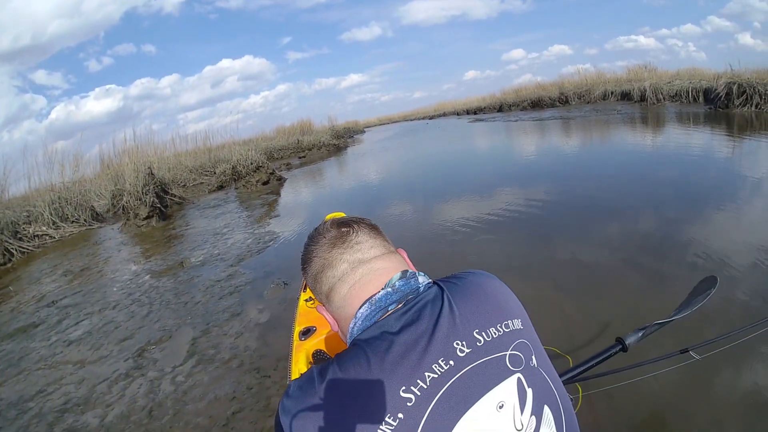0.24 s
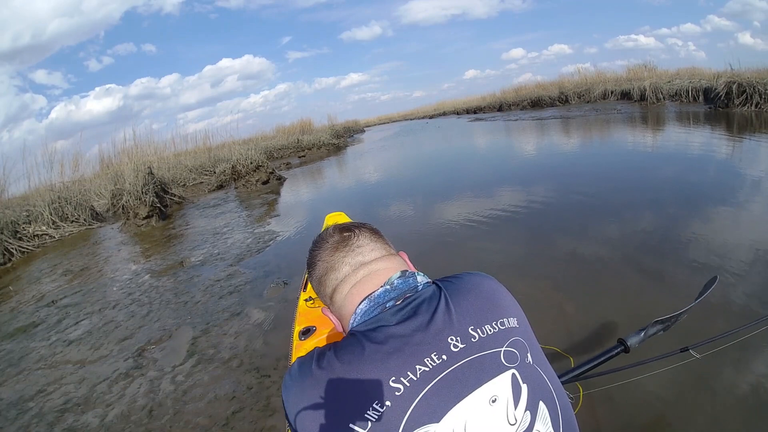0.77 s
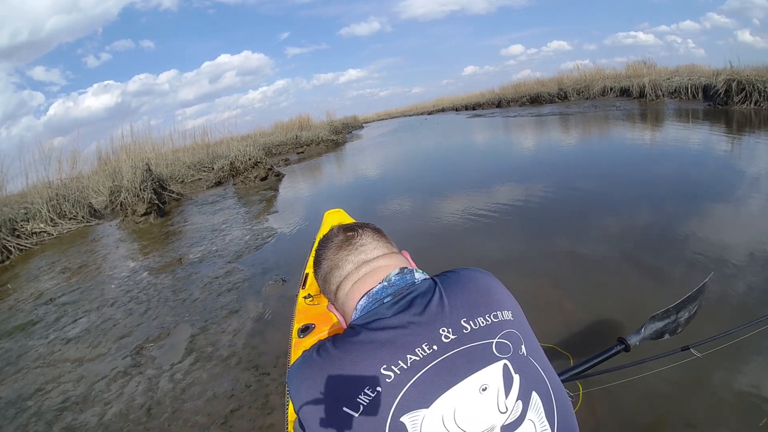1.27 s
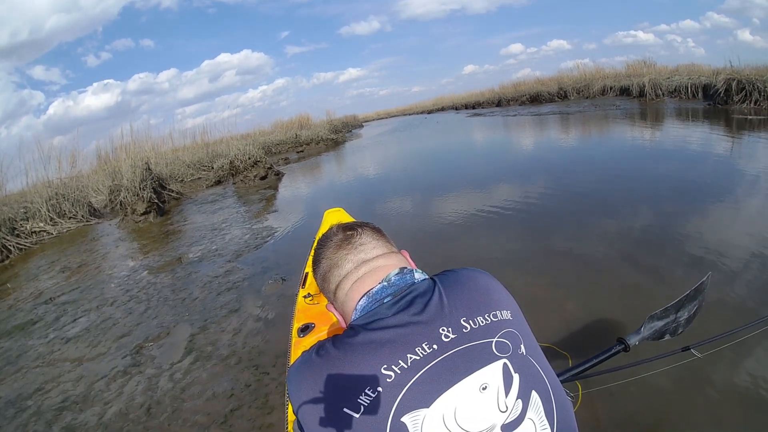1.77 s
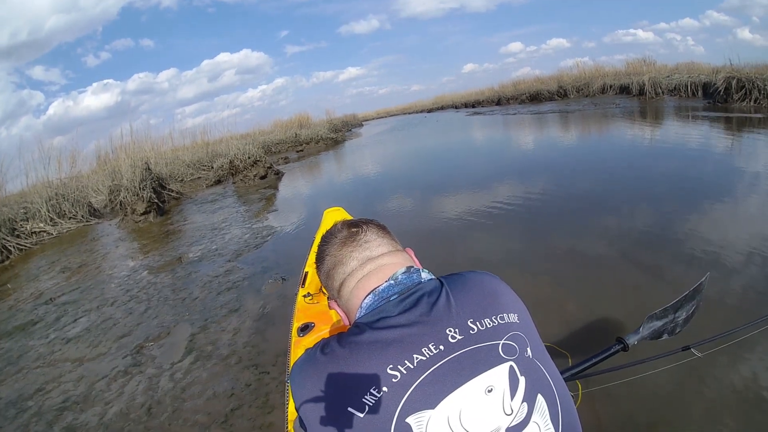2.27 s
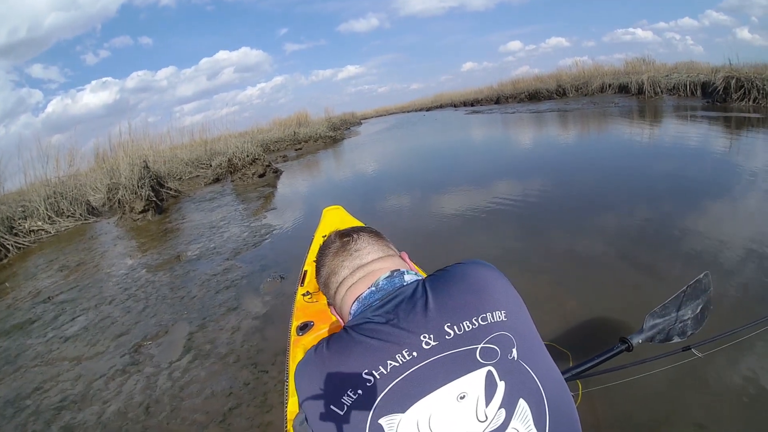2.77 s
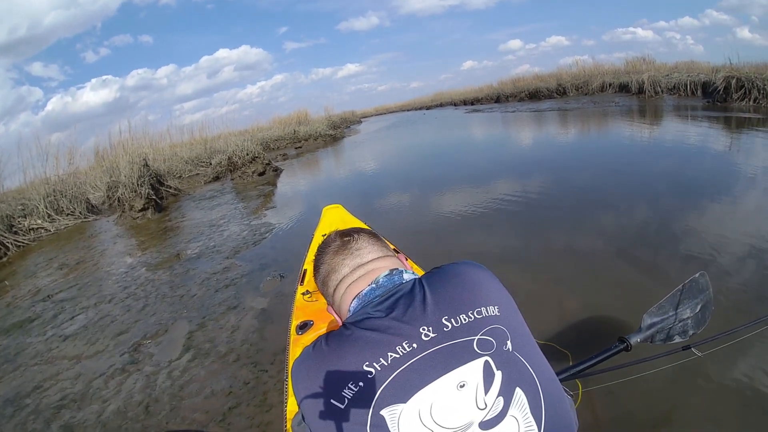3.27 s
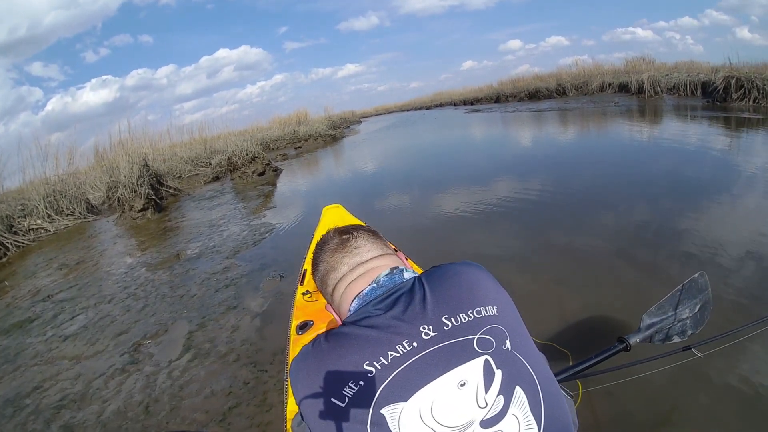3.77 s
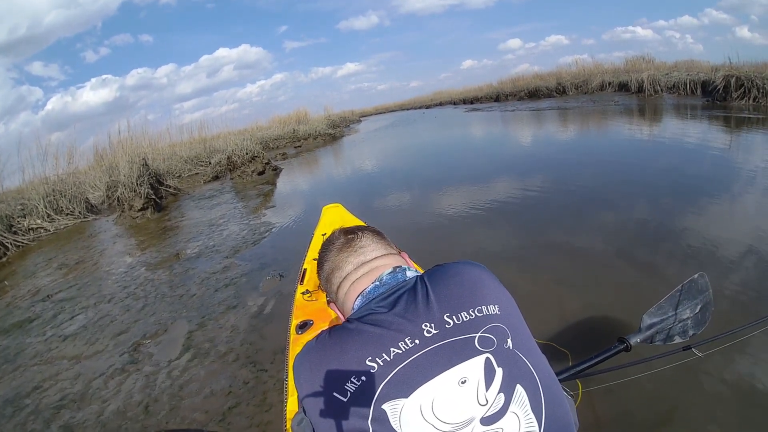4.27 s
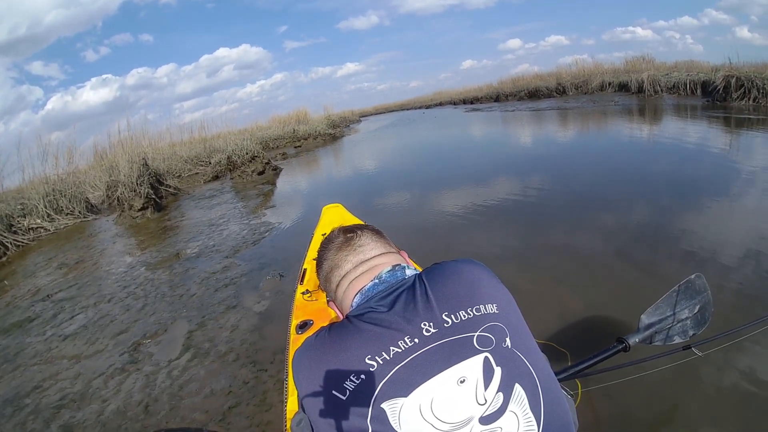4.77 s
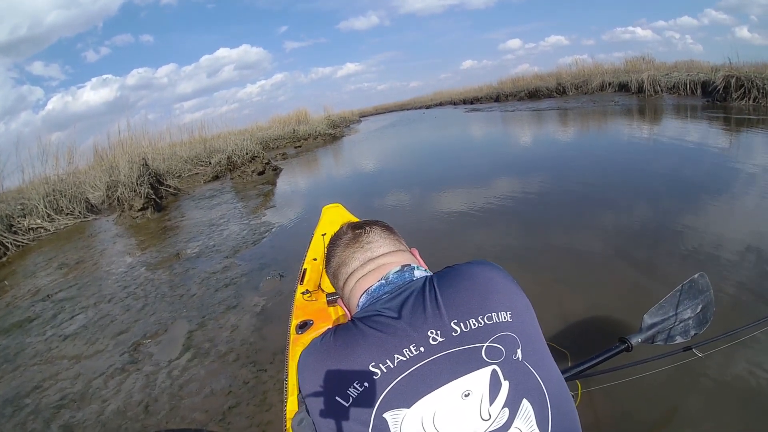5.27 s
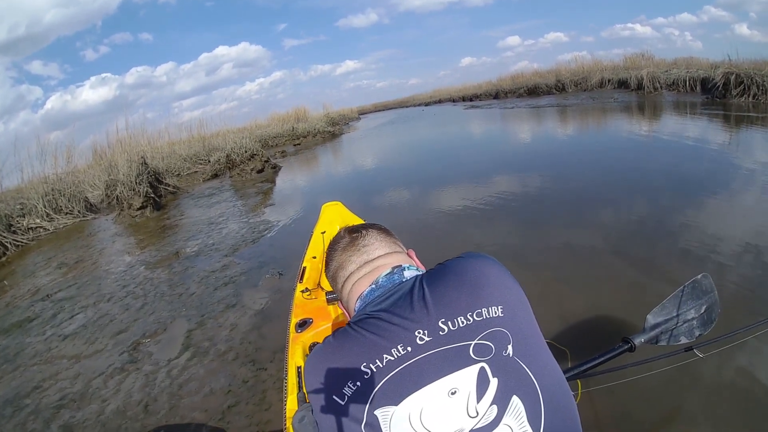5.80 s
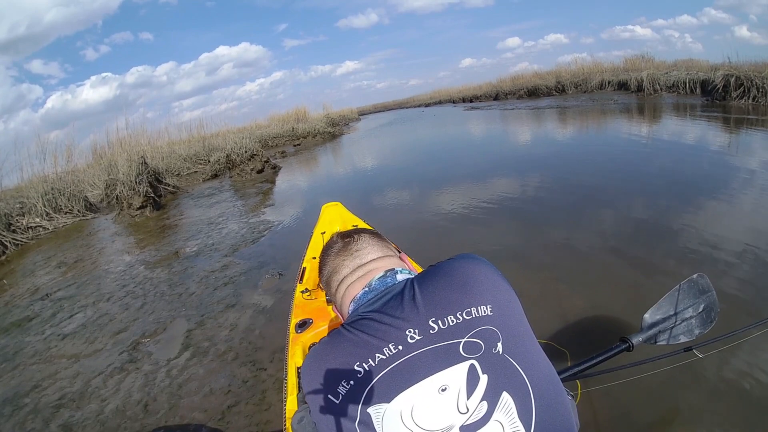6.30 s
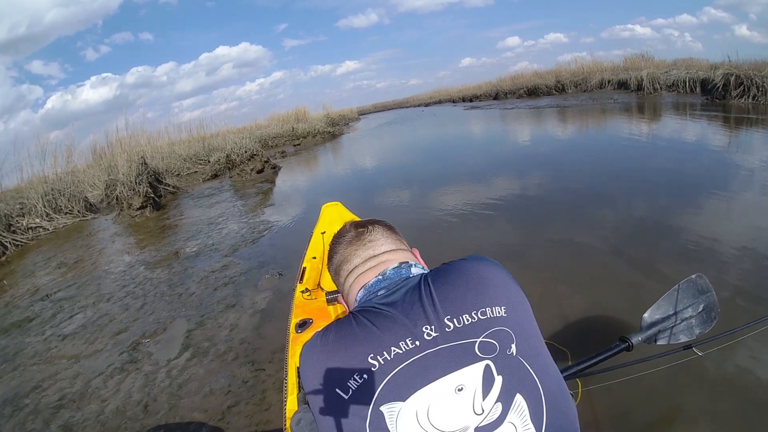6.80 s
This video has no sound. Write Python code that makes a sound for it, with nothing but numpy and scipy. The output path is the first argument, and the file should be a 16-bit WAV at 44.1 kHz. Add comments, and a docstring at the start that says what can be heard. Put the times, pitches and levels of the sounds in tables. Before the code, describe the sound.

An open, dry outdoor scene on calm water. A busy burst of clicking and sliding gear with dull thuds opens it, thinning to occasional short woody-plastic knocks around one, two and a half, and four seconds. A deep hull bump with a clatter precedes one hard knock near six seconds; soft cloth rustles and a small click end it. Wind bumps softly on the microphone over low rumble, thin hiss and barely audible water.

```python
"""Gear sorted in a drifting kayak

Hard objects knock on a hollow plastic deck, heavy ones thump the hull: impulses excite decaying modes.
Small tackle clicks, gear slides and sleeves rustle: shaped noise from many micro-contacts; squeaks glide.
Drops fall into the calm creek and a trickle gurgles: rising bubble tones and resonant noise bands.
Wind buffets the microphone and the open marsh rumbles and hisses: coloured noise of wavering level."""
import sys
import numpy as np
from scipy import signal
from scipy.fft import rfft, irfft
from scipy.io import wavfile
from scipy.ndimage import uniform_filter1d

SR = 44100
rng = np.random.default_rng(int(sys.argv[2]) if len(sys.argv) > 2 else 0)


def transcribe(u):
    """Save the signal u as a 16-bit wav file named by the first command-line argument.

    u: samples, shape (n,) or (channels, n), limited to [-1, 1]; the rate is SR.
    q: integer samples, one column per channel.
    """
    v = np.clip(np.atleast_2d(u).T, -1, 1)
    q = np.round(v * 32767).astype(np.int16)
    wavfile.write(sys.argv[1], SR, q)


N = 310905  # length in samples

# panel modes of the hollow deck: [mode_hz, level_db, t60_s]
DECK_MODES = [(545.5, 7.5, 0.068), (630, 0, 0.036), (749, 10, 0.043), (782, -0.5, 0.055), (823, -12, 0.066),
              (1094, -8.5, 0.03), (1370, -9, 0.014), (1560, -37, .02), (2520, 2.5, 0.014), (3900, -13, .01)]
# flexing modes of the whole hull, damped by the water: [mode_hz, level_db, t60_s]
HULL_MODES = [(73.8, -6, 0.47), (106, 4, 0.09), (151.2, -2.5, 0.24), (172, 5.5, 0.059), (214.4, -1, 0.15),
              (261, -10.5, 0.3), (393, -6, 0.11), (444, -3, 0.075)]
# hard knocks on the deck; the low cut is higher near a stiff edge, the ring share multiplies the deck's t60:
# [start_s, peak_db, contact_ms, low_cut_hz, ring_share (ratio)]
DECK_KNOCKS = [(0.528, -42, 0.47, 1040, 1.4), (.9470, -22.5, 0.72, 563, 0.84),
               (1.114, -45.5, 0.71, 600, 1.1), (2.178, -46.5, 1.33, 550, 1.2),
               (2.404, -42.5, 1.56, 460, 0.58), (2.411, -48, 0.52, 700, 1.5),
               (2.4693, -30, 0.54, 1150, 1.23), (2.594, -20, 0.65, 553, 0.84), (2.663, -39.5, 1.1, 456, 1),
               (2.846, -52, 0.54, 501, 0.73), (2.913, -54, 0.36, 910, 1.07), (3.502, -52, 0.8, 600, 1.8),
               (3.758, -50, 0.41, 760, 1.2), (3.793, -53, 0.45, 600, 1.02), (4.026, -45, 0.66, 784, 2.6),
               (4.225, -50, 0.48, 550, 1), (4.3112, -21, 0.66, 507, 0.95), (4.675, -43.5, 1.3, 448, 1.3),
               (4.888, -52.5, 0.73, 903, 1.2), (5.107, -39, 1.4, 600, 0.88), (5.123, -41, .85, 1050, .8),
               (5.166, -50, 1.2, 600, 1), (5.311, -36, 1.0, 604, 0.91), (5.321, -41, 0.62, 844, 0.86),
               (5.339, -52, 0.56, 800, 0.93), (5.857, -15, 0.65, 715, 0.93), (5.902, -38, 0.44, 1155, .8),
               (6.856, -43.5, 0.48, 770, 0.8)]
# soft heavy blows on the hull; the shake is relative to the blow: [start_s, peak_db, contact_ms, shake_db]
HULL_THUMPS = [(0.15, -27, 4.64, -31), (0.236, -28, 2.54, -11), (0.241, -33, 3.3, -23),
               (0.257, -28, 3.2, -22), (.29, -43, 3.4, -19), (.374, -38, 4, -10.5), (.47, -38, 3.2, -15),
               (.853, -30, 2.9, -19), (1.112, -46, 1.2, -5), (2.265, -34, 8, -19.5), (2.6, -33.5, 4, -29),
               (3.191, -49.5, 2, 0.5), (4.683, -38, 2.26, -25), (5.105, -18.5, 3.03, -16),
               (5.13, -32, 5.8, -14.5), (5.184, -39.5, 1.02, -11), (5.311, -27, 1.7, -13),
               (5.319, -31.5, 4.7, -19), (6.731, -48.5, 1.8, 2)]
# the clearest clicks of small tackle: [start_s, peak_db, t60_s, part_hz]
TACKLE_CLICKS = [(0.032, -38.5, 0.072, 1660), (0.064, -47, 0.062, 2500), (0.073, -52, 0.024, 2000),
                 (0.101, -47, 0.04, 2220), (0.219, -37.5, 0.058, 2140), (0.236, -36, 0.087, 2290),
                 (0.251, -36, 0.039, 2400), (0.259, -39.5, .025, 2350), (0.295, -44, 0.02, 2300),
                 (0.317, -39, 0.036, 2820), (0.358, -44, 0.022, 2970), (0.373, -47, 0.026, 2200),
                 (0.409, -57, .02, 2680), (.462, -40.5, 0.13, 1640), (0.485, -47, 0.017, 2800),
                 (0.553, -56, 0.03, 6500), (0.721, -55, 0.014, 2400), (0.746, -48.5, 0.014, 1190),
                 (0.777, -48, 0.02, 1700), (0.795, -49.5, 0.023, 2700), (0.901, -52, 0.023, 2630),
                 (1.043, -48, 0.04, 2700), (1.11, -44, 0.049, 2400), (1.352, -53.5, 0.017, 2930),
                 (1.481, -53.5, 0.014, 7000), (1.523, -51.5, 0.078, 4730), (1.909, -53.5, 0.019, 3900),
                 (1.928, -48.5, 0.025, 2760), (2.033, -48.5, 0.067, 3960), (2.122, -48, 0.031, 1990),
                 (2.173, -43.5, 0.06, 2410), (2.208, -57, .02, 2500), (2.226, -60, 0.023, 3600),
                 (2.248, -55, .04, 3600), (2.38, -48.5, 0.045, 2770), (2.41, -55, 0.013, 2670),
                 (2.465, -49, 0.073, 2670), (2.610, -51, 0.039, 4780), (2.892, -56, 0.03, 2267),
                 (3.194, -45, 0.021, 2000), (3.339, -54, 0.039, 5060), (3.463, -48.5, 0.044, 1800),
                 (3.771, -48.5, 0.024, 2460), (4.024, -46.5, 0.059, 2060), (4.268, -44.5, 0.054, 1670),
                 (4.67, -52.5, .02, 2090), (4.711, -48.5, 0.02, 1960), (5.105, -44, 0.1, 2300),
                 (5.121, -46, .04, 2000), (5.153, -49.5, 0.041, 3700), (5.182, -37.5, 0.055, 3280),
                 (5.185, -38.5, 0.019, 3110), (5.279, -37.5, 0.024, 3400), (5.304, -40.5, 0.045, 3790),
                 (5.32, -43, 0.12, 2202), (5.524, -50, 0.024, 1660), (5.764, -50, 0.032, 1187),
                 (5.859, -43.5, 0.005, 3270), (5.898, -45.5, 0.021, 1910), (6.603, -55, 0.056, 9450),
                 (6.731, -34.5, 0.024, 2240), (6.856, -42, 0.011, 1890)]
# slides and short scratches of gear over plastic; rms before the swell and fade:
# [middle_s, length_s, rms_db, tilt_db_per_octave]
GEAR_RUBS = [(0.069, 0.22, -57, -0.5), (0.187, 0.088, -62, 6.5), (0.234, 0.081, -55, 4),
             (.256, 0.011, -44.5, 5), (0.335, 0.25, -56.5, 2.5), (0.318, 0.017, -63, 9),
             (0.351, 0.037, -61, 6), (0.362, 0.017, -53, 6.5), (0.372, .012, -56, 2),
             (0.793, .36, -63.5, -2), (1.095, 0.18, -66, 3.5), (1.547, .09, -65, 5), (1.921, 0.22, -72, 9),
             (2.226, 0.17, -61.5, 2.5), (2.873, 0.27, -63, -7), (3.78, 0.072, -58.5, -4),
             (4.002, 0.089, -56, -7.5), (5.294, 0.05, -48.5, 1), (5.67, 0.37, -66.5, -1.5)]
# soft rustles of sleeves over the deck; rms before the swell and fade: [middle_s, length_s, rms_db]
SLEEVE_RUSTLES = [(0.721, 0.093, -64), (.865, 0.068, -61), (1.137, 0.046, -58.5), (2.024, 0.13, -55.5),
                  (3.392, 0.021, -60), (3.432, 0.05, -54.5), (3.458, 0.029, -51), (5.238, 0.096, -65),
                  (6.242, 0.054, -62), (6.291, 0.04, -58), (6.333, 0.066, -54.5), (6.364, 0.034, -59),
                  (6.603, .04, -68), (6.736, 0.12, -56)]
# short squeaks of gear dragged on the deck: [start_s, pitch_hz, glide_octaves, length_s, peak_db]
GEAR_SQUEAKS = [(0.113, 736, -0.01, 0.024, -38.5), (1.125, 977, -0.29, 0.028, -51.5)]
# drops, each trapping a bubble: [start_s, pitch_hz, rise_octaves, length_s, peak_db]
WATER_DROPS = [(0.011, 1470, 0.069, 0.008, -46.5), (0.967, 2710, 0.044, .007, -58),
               (1.531, 1106, 1, 0.041, -53), (1.533, 284, 0.89, 0.031, -46),
               (3.01, 2130, 0.29, 0.0094, -48), (4.493, 2600, .05, 0.0074, -58),
               (4.735, 1910, 0.23, 0.014, -52)]
# water trickling along the mud bank, in separate bands; rms before the slow laps: [band_hz, rms_db]
TRICKLE_BANDS = [(780, -78), (1050, -80.5), (1400, -80), (1850, -88), (2350, -84), (2800, -86.5),
                 (3600, -84.5)]
# strength of the wind on the microphone, before WIND_TRIM_DB and the small gusts: [time_s, level_db]
WIND_STRENGTH = [(0.0, -48), (0.33, -41.5), (0.51, -51.5), (0.92, -46), (0.99, -36.5), (1.1, -43),
                 (1.62, -50), (1.95, -47), (2.28, -39), (2.37, -43), (2.489, -38.5), (3.0, -40.5),
                 (3.261, -33), (3.3, -44), (3.551, -36), (3.93, -46), (4.73, -50), (5.3, -42), (5.58, -45),
                 (5.67, -35.5), (5.81, -46), (6.91, -51.5), (7.05, -50)]
# relative spectrum of plastic scraping on plastic: [frequency_hz, level_db]
SCRAPE_COLOUR = [(150, 12), (400, 10.5), (800, 8.5), (1300, 1), (2000, -3.5), (3200, -5), (4100, -9),
                 (4700, -14.5), (6000, -21), (13000, -32)]
# relative spectrum of cloth on plastic: [frequency_hz, level_db]
CLOTH_COLOUR = [(250, 1), (500, 2), (800, 3.5), (1150, -3.5), (1700, -12), (2700, -17.5), (4000, -34.5),
                (7000, -43)]
# relative spectrum of the wind: [frequency_hz, level_db]
WIND_COLOUR = [(10, 9.5), (22, 2), (36, -5.5), (55, -3.5), (80, -15.5), (130, -26), (250, -39), (600, -72)]
# relative spectrum of the steady rumble and hiss of the open marsh: [frequency_hz, level_db]
MARSH_COLOUR = [(30, -4), (55, -10), (82, 5.5), (120, -4.5), (170, -8), (250, -18.5), (400, -22.5),
                (600, -28.5), (780, -25), (1100, -47.5), (1800, -49.5), (2900, -48.5), (5000, -45),
                (13000, -45.5)]

TOP_HZ = 13050  # upper limit of the sound
SPOT_DETUNE, SPOT_SPREAD_DB = .006, 1  # standard deviations from spot to spot: ratio of pitch, dB of level
# the smaller the part, the higher it rings and the brighter it snaps
PLAIN_PART_HZ, BRIGHTEN_DB_PER_OCTAVE = 2020, 4.5
PART_RING_DB, PART_Q = 0, 7
# separate grains of a scratch, relative to the dense slips of a slide
GRAINS_PER_S, GRAIN_DB = 260, 0
# scratches where a slide snags; level relative to the slide, at mid-stroke
SNAGS_PER_S, SNAG_DB, SNAG_T60_S, SNAG_HZ, SNAG_OCTAVES = 38, 10, 0.041, 1670, 0.42
# faint ticks of the busy hands; an exponent above 1 thins them out with time
TICK_DB, TICK_T60_S, TICK_LOW_HZ, TICK_OCTAVES = -56, 0.013, 1900, 1.9
FIDGET_SPREAD_DB, FIDGET_THINNING = 8, 1.5
SPATTER_DB, SPATTER_Q = -6, 2  # noise around a gliding tone, relative to it
GURGLES_PER_S, GURGLE_DEPTH_DB, LAPS_PER_S, LAP_DEPTH_DB = 60, 3.5, 4, 1.2
# fizz of tiny bubbles: weakest peak and added range before the laps, lowest pitch and range above it
POP_DB, POP_SPREAD_DB, POP_LOW_HZ, POP_OCTAVES = -70, 9, 1470, 0.97
WIND_TRIM_DB, GUSTS_PER_S, GUST_DEPTH_DB = 1, 27, 2
AIR_DB, HISS_WAVERS_PER_S, HISS_DEPTH_DB = -55, 9, .8


def undb(db):
    """Logarithmic level: decibels become an amplitude gain."""
    return 10 ** (np.asarray(db) / 20)


def unit(x):
    """Mean power: scale a signal to rms 1."""
    return x / np.sqrt(np.mean(x ** 2))


def peak(x, db):
    """Peak amplitude: scale a signal to a peak level in dB."""
    return x * undb(db) / np.abs(x).max()


def seconds(length):
    """Sampling: the time axis of a short sound."""
    return np.arange(int(length * SR)) / SR


def add(track, s, sound):
    """Superposition: mix a sound into the track at time s, trimming what falls outside."""
    start = int(s * SR)
    sound = sound[max(-start, 0):N - start]
    first = max(start, 0)
    track[first:first + len(sound)] += sound


def colour(x, points, tilt_db=0):
    """Spectral shaping: filter by a (Hz, dB) outline with an optional tilt in dB per octave."""
    hz, db = np.transpose(points)
    octave = np.log2(np.maximum(np.fft.rfftfreq(len(x), 1 / SR), 1))
    tilted_db = db + tilt_db * np.log2(hz / hz[0])
    gain = undb(np.interp(octave, np.log2(hz), tilted_db))
    low_roll_off = np.minimum(2 ** octave / hz[0], 1) ** 2  # 12 dB per octave below the first point
    return irfft(rfft(x) * gain * low_roll_off, len(x))


def band(x, hz, q):
    """Resonance: pass one peak around hz, of quality factor q."""
    return signal.lfilter(*signal.iirpeak(min(hz, TOP_HZ), q, fs=SR), x)


def ring(force, modes, low_hz):
    """Modal superposition: a force drives decaying modes; a panel radiates little below low_hz."""
    t = seconds(.3)
    response = np.zeros(len(t))
    for hz, db, t60 in modes:
        decay = np.exp(-np.log(1000) * t / t60)
        response += undb(db) * decay * np.cos(2 * np.pi * hz * t)
    radiation = signal.butter(3, low_hz, "high", fs=SR, output="sos")
    return signal.sosfilt(radiation, signal.fftconvolve(force, response))


def push(contact_ms):
    """Impact: a half-sine force, whose longer contact gives a duller sound."""
    length = contact_ms / 1000
    return np.sin(np.pi * seconds(length) / length)


def slips(size, spread_db):
    """Stick-slip friction: dense slips of uneven strength, smeared by a few ms of ringing in the plastic."""
    t = seconds(.0035)
    strength = undb(spread_db * np.minimum(rng.exponential(size=size), 6))
    power = signal.fftconvolve(strength ** 2, np.exp(-5 * t / t[-1]), "same")
    return rng.standard_normal(size) * np.sqrt(np.abs(power))


def chatter(t60, rise_s):
    """Repeated contact: a quick run of micro-impacts builds up and dies away."""
    t = seconds(.2)
    envelope = (1 - np.exp(-t / rise_s)) * np.exp(-np.log(1000) * t / t60)
    return slips(len(t), spread_db=5.0) * envelope


def catching(size, rate, depth_db):
    """Random modulation: a gain that wavers, as when a sliding contact grips and lets go."""
    steps = rng.standard_normal(N)
    return undb(depth_db * np.interp(np.arange(size) * rate / SR, np.arange(N), steps))


def knocks():
    """Modal excitation: one push rings the deck, each spot weighting its modes; loose gear buzzes faintly."""
    out = np.zeros(N)
    hz, mode_db, t60 = np.transpose(DECK_MODES)
    for s, db, contact_ms, low_hz, ring_share in DECK_KNOCKS:
        detune, weight = rng.standard_normal((2, len(DECK_MODES)))
        spot_hz = hz * (1 + SPOT_DETUNE * detune)
        spot_db = mode_db + SPOT_SPREAD_DB * weight
        spot = zip(spot_hz, spot_db, t60 * ring_share)
        add(out, s, peak(ring(push(contact_ms), spot, low_hz), db))
        buzz = colour(chatter(t60=0.085, rise_s=0.0092), SCRAPE_COLOUR, tilt_db=-4.0)
        add(out, s, peak(buzz, db - 25))
    return out


def thumps():
    """Flexural vibration: a slow push bends the hull, and the load chatters on the deck as it settles."""
    out = np.zeros(N)
    for s, db, contact_ms, shake_db in HULL_THUMPS:
        add(out, s, peak(ring(push(contact_ms), HULL_MODES, low_hz=47.0), db))
        soften = signal.butter(2, 650, fs=SR, output="sos")
        settle = signal.sosfilt(soften, chatter(t60=0.16, rise_s=0.0022))
        deck_shake = unit(ring(settle, DECK_MODES, low_hz=228))
        hull_shake = undb(9.0) * unit(ring(settle, HULL_MODES, low_hz=325))
        add(out, s, peak(deck_shake + hull_shake, db + shake_db))
    return out


def click(db, t60, hz):
    """Small-body resonance: a part snaps and chatters, ringing briefly at its own pitch."""
    tilt_db = BRIGHTEN_DB_PER_OCTAVE * np.log2(hz / PLAIN_PART_HZ)
    snap = colour(chatter(t60, rise_s=0.00024), SCRAPE_COLOUR, tilt_db)
    return peak(snap + undb(PART_RING_DB) * band(snap, hz, PART_Q), db)


def clicks():
    """Collision of small bodies: tackle parts snap and chatter against each other."""
    out = np.zeros(N)
    for s, db, t60, hz in TACKLE_CLICKS:
        add(out, s, click(db, t60, hz))
    return out


def grains(size):
    """Sparse friction: separate scratches of uneven strength, each a millisecond or two long."""
    t = seconds(.005)
    happens = rng.exponential(size=size), rng.random(size) < GRAINS_PER_S / SR
    strength = undb(4.8 * np.minimum(happens[0], 3)) * happens[1]
    envelope = signal.fftconvolve(strength, np.exp(-4 * t / t[-1]), "same")
    return rng.standard_normal(size) * envelope


def rub(length, db, tilt_db):
    """Sliding friction: a stroke swells and fades, scratching and catching, and faintly rings the deck."""
    size = int(length * SR)
    contact = unit(slips(SR, spread_db=3.5)) + undb(GRAIN_DB) * unit(grains(SR))
    scrape = colour(contact, SCRAPE_COLOUR, tilt_db)[:size]
    grit = scrape * catching(size, rate=142.4, depth_db=2.0)
    deck_ring = ring(grit, DECK_MODES, low_hz=493)[:size]
    slide = unit(grit) + undb(-4.5) * unit(deck_ring)
    return unit(slide) * np.hanning(size) * undb(db)


def rubs():
    """Friction with snags: gear slides over plastic, scratching hardest in the middle of each stroke."""
    out = np.zeros(N)
    for s, length, db, tilt_db in GEAR_RUBS:
        add(out, s - length / 2, rub(length, db, tilt_db))
        snag_count = int(SNAGS_PER_S * length)
        for when, pitch in rng.random(size=(40, 2))[:snag_count]:
            # a brighter slide has higher snags
            octaves = SNAG_OCTAVES * pitch + tilt_db / BRIGHTEN_DB_PER_OCTAVE / 2
            scratch = click(db + SNAG_DB, SNAG_T60_S, SNAG_HZ * 2 ** octaves)
            add(out, s + (when - .5) * length, scratch * np.sin(np.pi * when))
    return out


def rustles():
    """Fibre friction: cloth brushes the deck in soft, grainy strokes."""
    out = np.zeros(N)
    for s, length, db in SLEEVE_RUSTLES:
        size = int(length * SR)
        fibres = colour(slips(SR, spread_db=3.5), CLOTH_COLOUR)[:size]
        fibres = fibres * catching(size, rate=170, depth_db=1.0)
        add(out, s - length / 2, unit(fibres) * np.hanning(size) * undb(db))
    return out


def bubble(hz, rise, length):
    """Bubble resonance: a tone starts quickly, then fades while its pitch glides by rise octaves."""
    t = seconds(length)
    swell = np.sin(np.pi * (t / length) ** 0.7)
    phase = 2 * np.pi * np.cumsum(hz * 2 ** (rise * t / length)) / SR
    return swell * np.sin(phase)


def chirp(hz, rise, length):
    """Frequency glide: a short tone wobbles in level, blurred by a little noise around its pitch."""
    tone = bubble(hz, rise, length)
    wobble = catching(len(tone), rate=500, depth_db=2.5)
    noise = rng.standard_normal(SR)
    spatter = band(band(noise, hz, SPATTER_Q), hz, SPATTER_Q)[:len(tone)]
    blurred = unit(tone * wobble) + undb(SPATTER_DB) * unit(spatter)
    return blurred * np.sqrt(np.hanning(len(tone)))


def squeaks():
    """Stick-slip oscillation: dragged gear squeaks for a moment, and the deck rings on after it."""
    out = np.zeros(N)
    for s, hz, glide, length, db in GEAR_SQUEAKS:
        slip = chirp(hz, glide, length)
        add(out, s, peak(slip, db))
        add(out, s, peak(ring(slip, DECK_MODES, low_hz=500), db - 12))
    return out


def fidgeting(count):
    """Thinning random impacts: the hands nudge tiny parts, less and less often."""
    out = np.zeros(N)
    for k, (when, strength, pitch) in enumerate(rng.random(size=(count, 3))):
        s = ((k + when) / count) ** FIDGET_THINNING * N / SR
        db = TICK_DB + FIDGET_SPREAD_DB * (strength - .5)
        hz = min(TICK_LOW_HZ * 2 ** (TICK_OCTAVES * pitch), TOP_HZ)
        add(out, s, click(db, TICK_T60_S, hz))
    return out


def drops():
    """Entrained-air resonance: each drop traps a wobbling bubble that climbs in pitch near the surface."""
    out = np.zeros(N)
    for s, hz, rise, length, db in WATER_DROPS:
        add(out, s, peak(chirp(hz, rise, length), db))
    return out


def water():
    """Bubble noise: a gurgling trickle and a soft fizz waver with the ripples, which also pat the boat."""
    out = np.zeros(N)
    for hz, db in TRICKLE_BANDS:
        stream = band(band(rng.standard_normal(N), hz, q=3.2), hz, q=3.2)
        out += undb(db) * unit(stream * catching(N, GURGLES_PER_S, GURGLE_DEPTH_DB))
    for when, pitch, life, strength in rng.random(size=(520, 4)):
        length = .001 + .002 * life ** 2
        hz = POP_LOW_HZ * 2 ** (POP_OCTAVES * np.sqrt(pitch))
        pop = bubble(hz, rise=0.031, length=length)
        add(out, when * N / SR, peak(pop, POP_DB + POP_SPREAD_DB * strength ** 3))
    pat = ring(push(contact_ms=0.99), DECK_MODES, low_hz=850)
    for when, strength in rng.random(size=(60, 2)):
        add(out, when * N / SR, peak(pat, -66 + 8 * strength ** 2))
    return out * catching(N, LAPS_PER_S, LAP_DEPTH_DB)


def wind():
    """Turbulent pressure: slow eddies buffet the microphone, with quick small gusts on top."""
    s, db = np.transpose(WIND_STRENGTH)
    eddies = unit(colour(rng.standard_normal(N), WIND_COLOUR))
    # even out the noise, so that the table sets the level
    eddies = eddies / np.sqrt(uniform_filter1d(eddies ** 2, size=9000))
    strength_db = np.interp(np.arange(N) / SR, s, db) + WIND_TRIM_DB
    return eddies * undb(strength_db) * catching(N, GUSTS_PER_S, GUST_DEPTH_DB)


def marsh():
    """Broadband ambience: a far rumble wavers under a thin hiss that breathes with the breeze."""
    air = unit(colour(rng.standard_normal(N), MARSH_COLOUR))
    low_pass = signal.butter(2, 1200, fs=SR, output="sos")
    rumble = signal.sosfiltfilt(low_pass, air)
    hiss = (air - rumble) * catching(N, HISS_WAVERS_PER_S, HISS_DEPTH_DB)
    return (hiss + rumble * catching(N, rate=24, depth_db=2.0)) * undb(AIR_DB)


def scene():
    """Free field: all sources add directly, close and in the open, without reverberation."""
    gear = knocks() + thumps() + clicks() + rubs() + rustles() + squeaks() + fidgeting(count=24)
    return (gear + drops() + water() + wind() + marsh())[None]


def record(dry):
    """Band limiting: a 4 ms fade-in avoids a click, and a steep low-pass removes what lies above TOP_HZ."""
    fade_in = np.minimum(np.arange(N) / SR / .004, 1)
    low_pass = signal.ellip(10, .2, 70, TOP_HZ, fs=SR, output="sos")
    return signal.sosfilt(low_pass, dry * fade_in)


dry = scene()
out = record(dry)
transcribe(out)
```